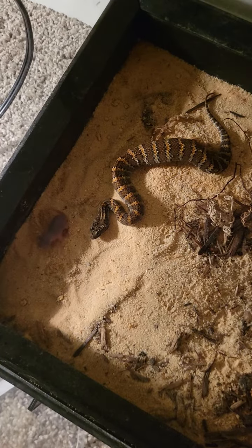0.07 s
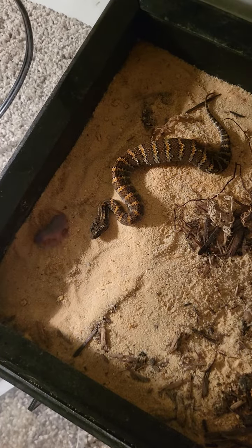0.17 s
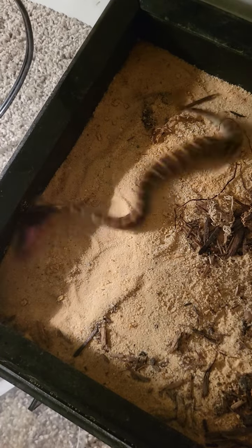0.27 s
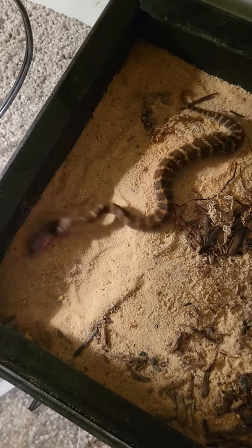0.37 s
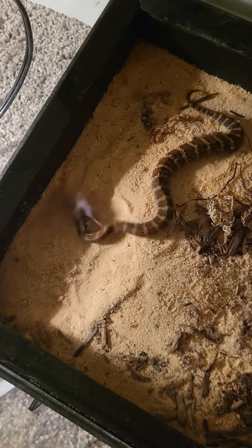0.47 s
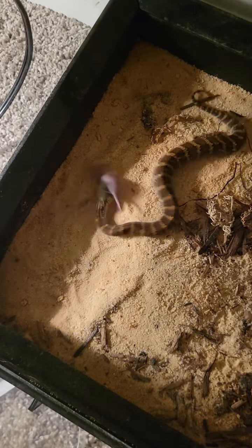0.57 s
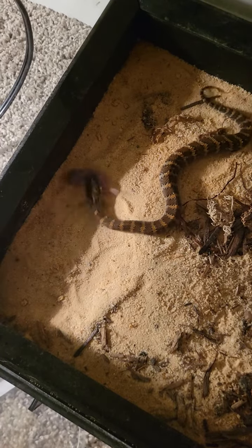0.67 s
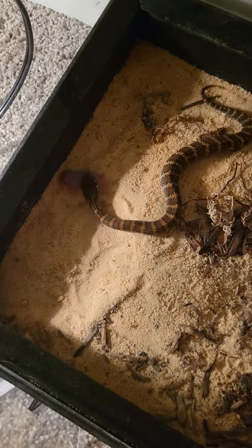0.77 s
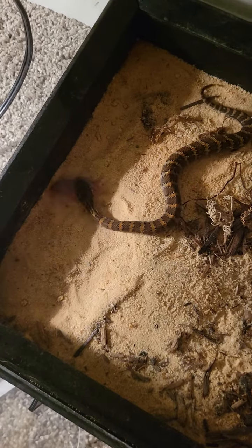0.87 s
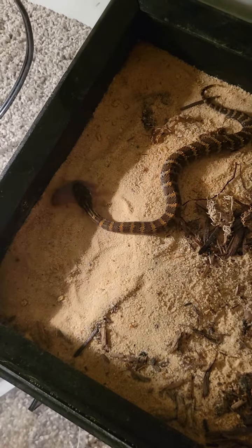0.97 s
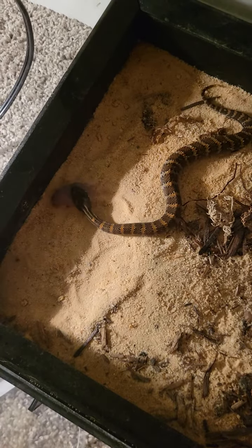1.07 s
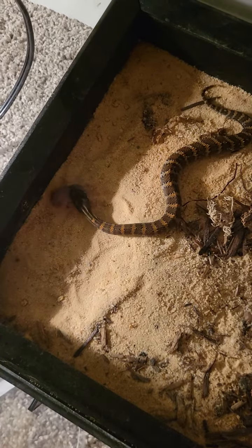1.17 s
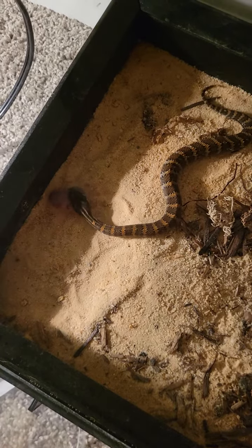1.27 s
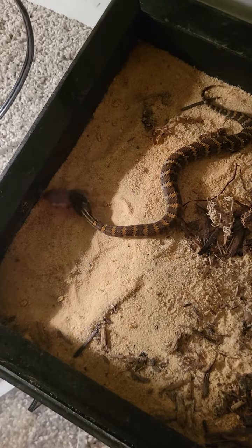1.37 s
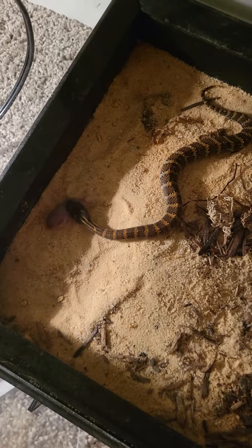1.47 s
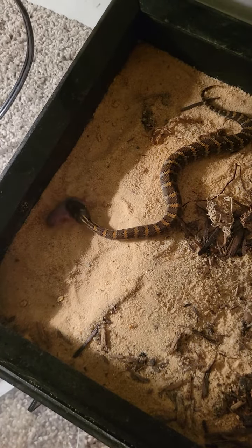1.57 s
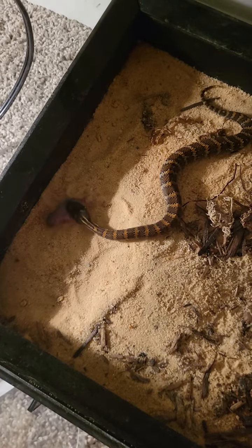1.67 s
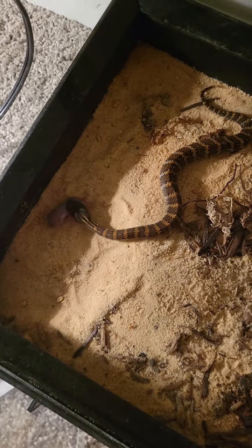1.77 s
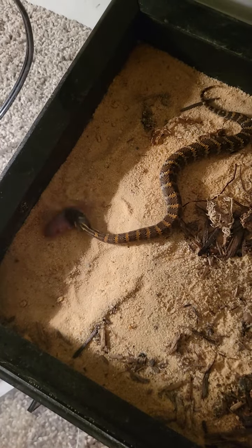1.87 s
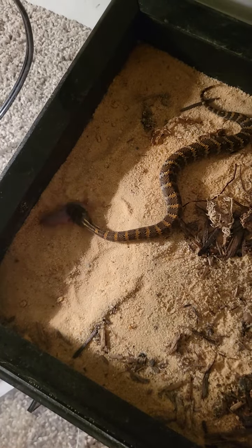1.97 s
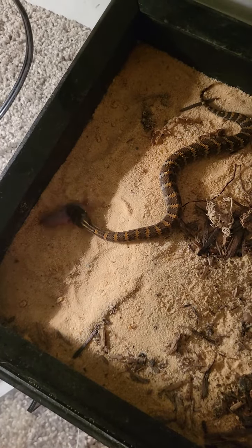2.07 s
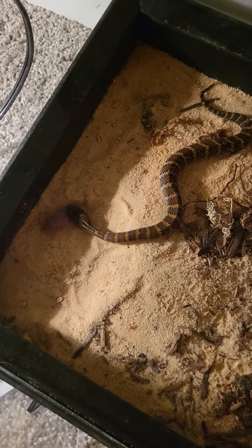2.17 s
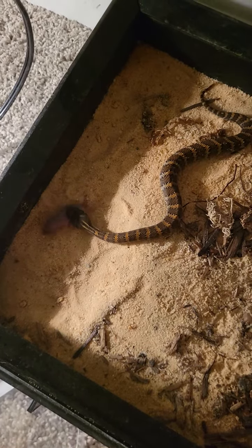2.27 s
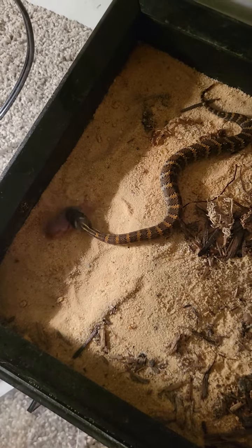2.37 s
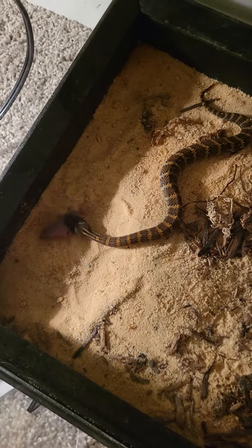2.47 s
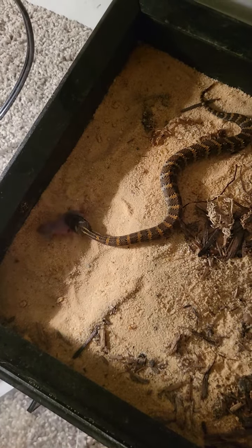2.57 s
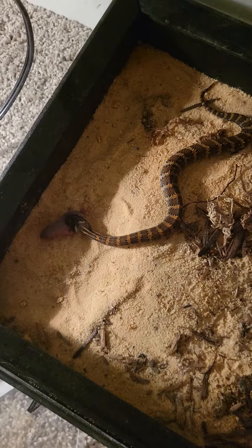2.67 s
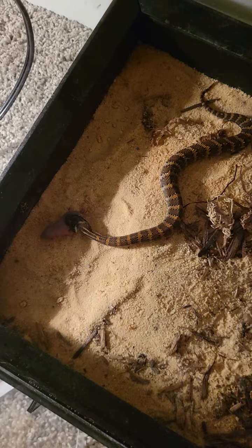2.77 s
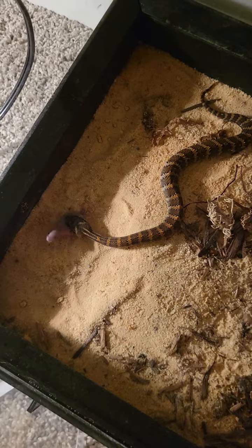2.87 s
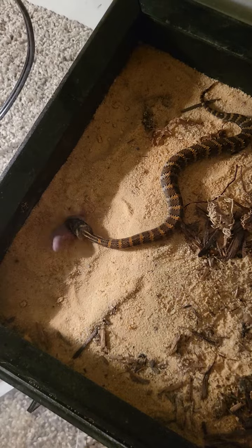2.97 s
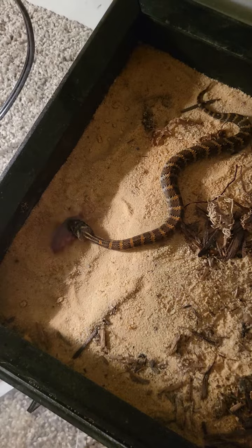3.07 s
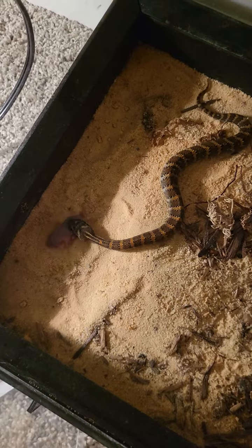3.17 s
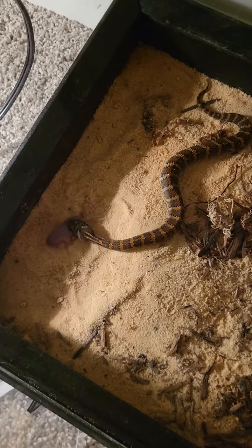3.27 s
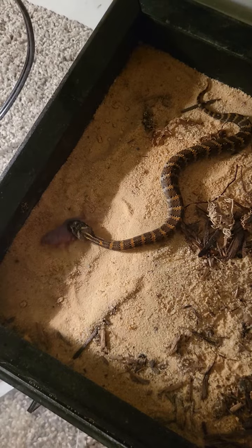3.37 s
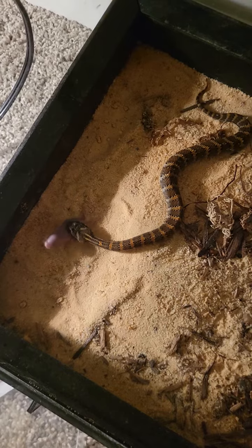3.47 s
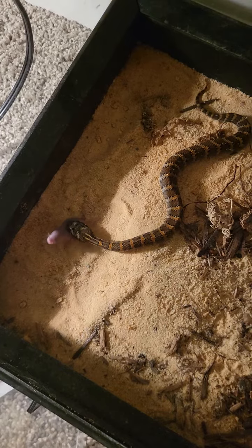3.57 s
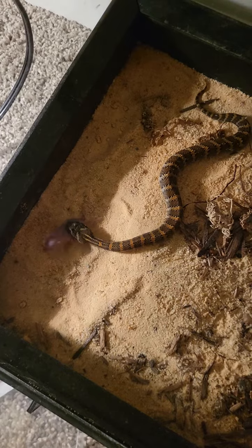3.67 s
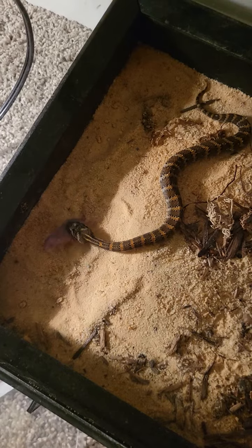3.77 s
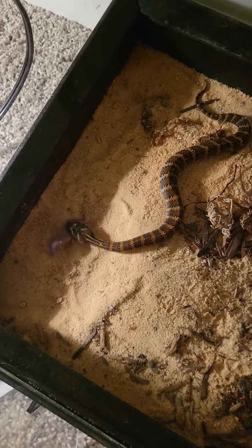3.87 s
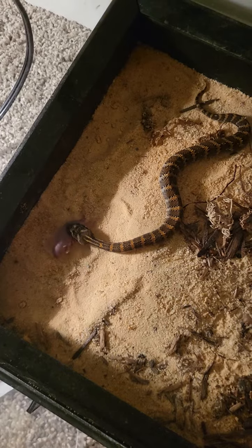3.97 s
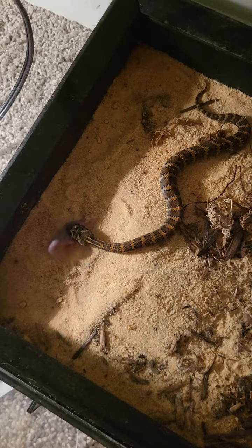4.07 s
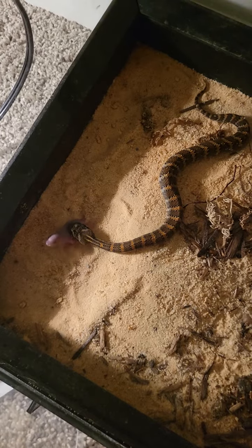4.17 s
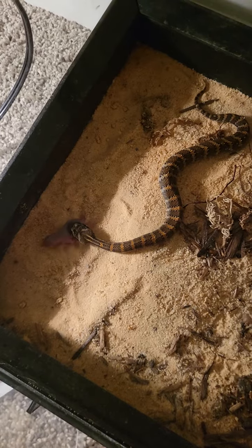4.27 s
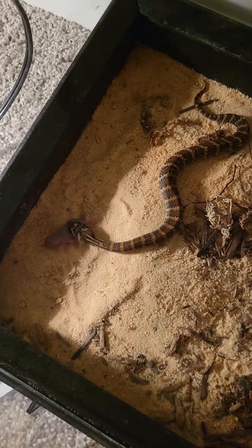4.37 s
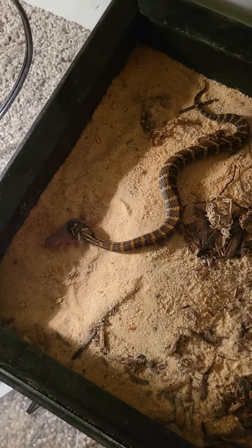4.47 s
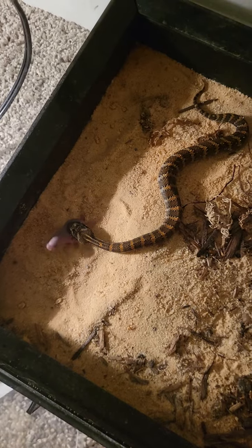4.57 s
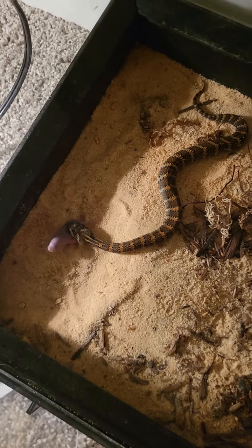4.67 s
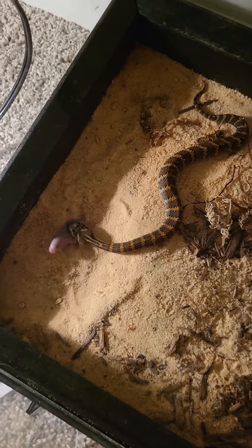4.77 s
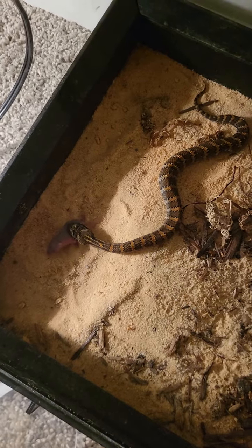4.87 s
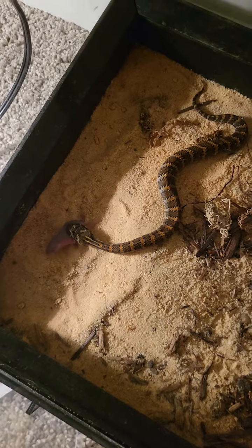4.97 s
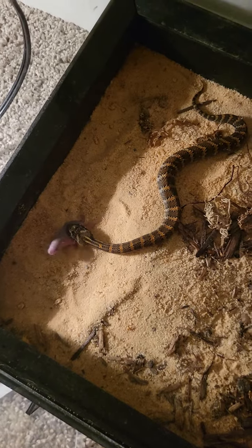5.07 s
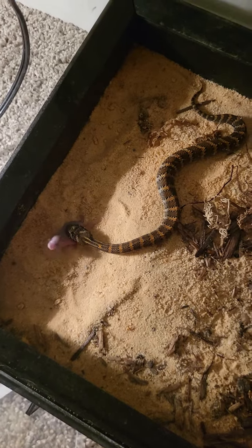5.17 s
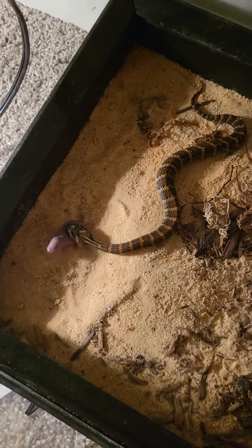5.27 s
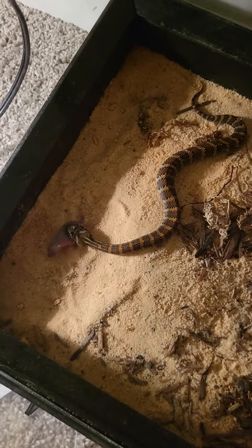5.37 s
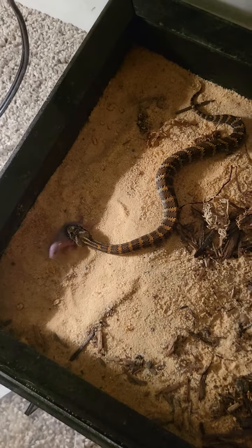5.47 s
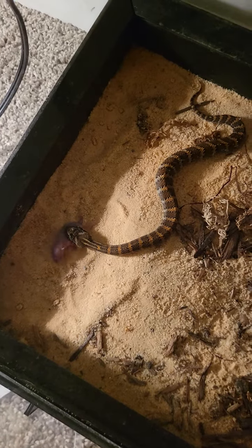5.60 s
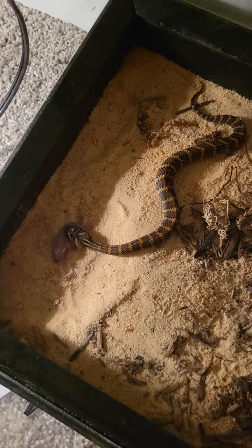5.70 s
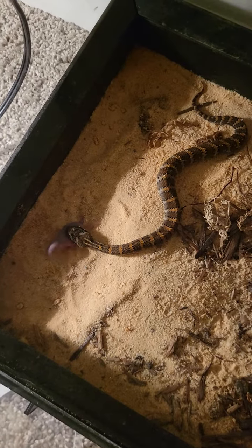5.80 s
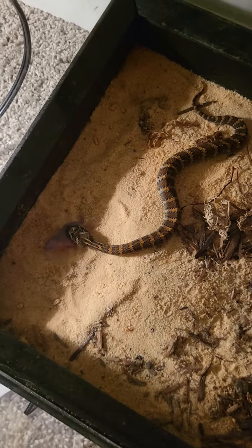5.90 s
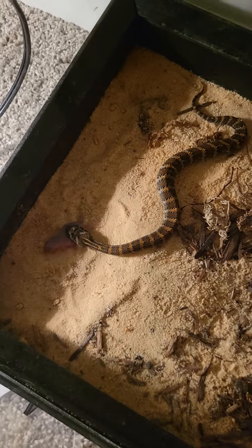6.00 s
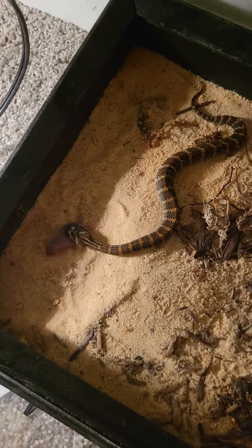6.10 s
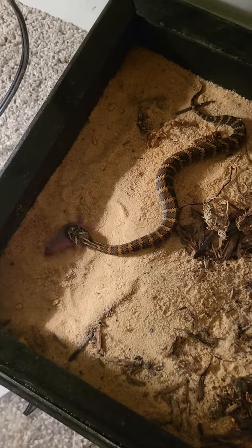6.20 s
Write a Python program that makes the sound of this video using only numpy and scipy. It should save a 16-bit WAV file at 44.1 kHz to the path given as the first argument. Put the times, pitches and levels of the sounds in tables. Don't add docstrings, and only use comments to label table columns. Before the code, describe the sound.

Tiny high rodent squeaks repeat, slow and stop in a quiet room; brief sand rustles precede them and a plastic double knock follows.

```python
import sys
import numpy as np
from scipy import signal
from scipy.fft import rfft, irfft, next_fast_len
from scipy.io import wavfile
from scipy.ndimage import uniform_filter1d

SR = 44100
rng = np.random.default_rng(int(sys.argv[2]) if len(sys.argv) > 2 else 0)


def volts_from_db(level):
    exponent = np.asarray(level, float) / 20
    return 10 ** exponent


def dump(signal):
    limited = np.clip(np.atleast_2d(signal).T, -1, 1)
    pcm = np.round(limited * 32767).astype(np.int16)
    wavfile.write(sys.argv[1], SR, pcm)


N = 275095


def rms_one(x):
    return x / np.sqrt(np.mean(x ** 2) + 1e-20)


def at_hz(points, hz):
    known_hz, values = np.array(points).T
    return np.interp(np.log(np.maximum(hz, 1)), np.log(known_hz), values)


def wobble(rate_hz, size):
    r = np.exp(-2 * np.pi * rate_hz / SR)
    return rms_one(signal.lfilter([1], [1, -2 * r, r * r], rng.standard_normal(size)))


def coloured(x, points):
    size = next_fast_len(x.shape[-1])
    gain = volts_from_db(at_hz(points, np.fft.rfftfreq(size, 1 / SR)))
    return irfft(rfft(x, size) * gain, size)[..., :x.shape[-1]]


def ring(at_s, peak_db, hz, t60, rise_s):
    out, start = np.zeros(N), round(at_s * SR)
    t = np.arange(min(N - start, round(1.5 * max(t60, .001) * SR))) / SR
    envelope = volts_from_db(peak_db - 60 * t / t60) * (1 - np.exp(-t / rise_s))
    out[start:start + len(t)] = envelope * np.sin(2 * np.pi * hz * t)
    return out


def puff(at_s, peak_db, spectrum, t60):
    out, start = np.zeros(N), round(at_s * SR)
    t = np.arange(2200) / SR
    noise = rms_one(coloured(rng.standard_normal(len(t)), spectrum))
    out[start:start + len(t)] = volts_from_db(peak_db - 60 * t / t60) * noise
    return out


def pitch_arch(t, length, rise_s, top_hz, sagged_hz, lateness, collapse_s):
    open_hz, close_hz = 2412, 2037
    pitch = top_hz - (top_hz - sagged_hz) * np.minimum(t / length, 1) ** lateness
    pitch -= (pitch - close_hz) * np.clip(1 - (length - t) / collapse_s, 0, 1) ** 2
    opening = np.clip(1 - t / rise_s, 0, 1) ** 2.5
    return pitch - (pitch - open_hz) * opening


# pitch_hz, level_db
MOUTH = [(1800, -6), (2800, -9.5), (3500, -4.5), (4800, 4.5), (6200, -4), (7500, 2.5), (9500, -9),
         (11500, 3.5), (13000, 6), (14200, 0), (15300, -13), (16500, -16)]


def overtones(pitch, tilt_db, tired_db, glide):
    size = len(pitch)
    jitter = .0025 * volts_from_db(tired_db) * (1 + 3 * glide) * wobble(450, size)
    phase = 2 * np.pi * np.cumsum(pitch * (1 + .004 * wobble(60, size) + jitter)) / SR
    tone, power = np.zeros(size), np.zeros(size)
    for k in range(1, 8):
        shimmer_db = 1.0 * volts_from_db(1.8 * tired_db) * wobble(220, size)
        level_db = at_hz(MOUTH, k * pitch) + np.clip(tilt_db, -9, 11) * np.log2(k) + shimmer_db
        gain = volts_from_db(level_db) * (k * pitch < .45 * SR)
        tone += gain * np.sin(k * phase + k * k)
        power += gain * gain / 2
    return tone / uniform_filter1d(np.sqrt(power), size=400)


# at_s, pitch_hz, width_s, level_db
JERKS = [
    (.584, 383.5, 0.0054, 5),
    (1.134, -120, 0.019, 0),
    (1.195, -80.5, .012, 2),
    (2.073, -200, 0.011, -1),
    (2.095, 157, 0.011, -1),
    (3.333, -110, 0.019, 1),
    (3.353, 61.5, 0.012, 0),
    (4.738, 61, 0.0053, -3),
]
# pitch_hz, level_db
LEAK = [(1200, -24), (2000, -18), (3600, -9), (5300, -9.5), (7500, -3), (9700, -8.5), (12000, 3.5),
        (14200, 3), (16500, -6)]
# pitch_hz, level_db
GASP = [(1500, 1.5), (2500, 5), (6000, 3.5), (16000, 5.5)]


def squeak(start, length, level_db, rise_s, tilt_db, top_hz, sagged_hz, lateness, collapse_s):
    t = np.arange(round((length + 0.071) * SR)) / SR
    spent = t / length
    pitch = pitch_arch(t, length, rise_s, top_hz, sagged_hz, lateness, collapse_s)
    for at_s, hz, width_s, db in JERKS:
        jerk = np.exp(-((start + t - at_s) / width_s) ** 2)
        pitch = pitch + hz * jerk
        level_db = level_db + db * jerk

    effort = np.log2(pitch / 4236)
    level_db = level_db + 10 * effort - 6.5 * np.clip(1 - t / 0.011, 0, 1)
    glide = np.clip(abs(np.gradient(np.log(pitch))) * SR / 40, 0, 1)
    late_s = max(start - 3.5, 0)
    tired_db = 5 * late_s
    tilt_db = tilt_db + 15 * effort + 1.2 * tired_db - 3.5 * glide * np.minimum(spent, 1)
    tone = overtones(pitch, tilt_db, tired_db, glide)

    air_noise = rms_one(coloured(rng.standard_normal(len(t)), LEAK))
    voiced = np.clip((length - t) / 0.0013, 0, 1)
    gasp = volts_from_db(-6) * np.maximum(glide ** 1.2, 1 - voiced) * rms_one(coloured(air_noise, GASP))
    breath_db = -28 + (15 + tired_db) * np.minimum(spent, 1) + 2.6 * wobble(60, len(t))
    pop = volts_from_db(7) * np.exp(-t / .003)
    gasp_s = .001 + .009 * late_s
    fade = np.clip(t / 0.0017, 0, 1) * volts_from_db(-1500 * np.maximum(t - length - gasp_s, 0))
    mix = voiced * volts_from_db(-5 * glide) * tone + (volts_from_db(breath_db) + pop) * air_noise + gasp
    return volts_from_db(level_db) * fade * mix


# start_s, length_s, level_db, rise_s (time to reach pitch), tilt_db (per octave of overtone)
SQUEAKS = [(0.5607, 0.11, -34.5, 0.016, 2.5), (0.808, 0.12, -33.5, 0.033, -3),
           (1.0753, 0.14, -34.5, 0.026, 0), (1.3804, 0.11, -35.5, 0.039, -1.5),
           (1.6717, 0.12, -33, 0.019, 1.5), (1.9858, 0.12, -33, 0.029, 1.5),
           (2.319, 0.13, -33.5, 0.015, 3.5), (2.6736, 0.11, -35, 0.037, 1),
           (3.2833, .1238, -33.5, .031, 2.5), (3.975, .080, -36, 0.027, 0), (4.3333, .088, -35, .025, -2),
           (4.7184, .0445, -36, 0.026, -1.5)]
# top_hz, sagged_hz, lateness (power of the sag), collapse_s
ARCHES = [(5114, 2300, 3, 0.035), (5066, 3150.0, 1.73, 0.013), (4960, 3300.0, 0.74, 0.021),
          (4910, 2610.0, 1.7, 0.036), (5180, 3550.0, 0.98, 0.038), (5570, 3120.0, 0.63, 0.028),
          (4525, 3600, 2.6, 0.019), (5810, 3400.0, 0.52, 0.029), (4180, 2300, 5.4, 0.025),
          (4004, 2970.0, 1.26, 0.01224), (4410, 2940.0, 1.11, 0.031), (3870, 2100, 3, 0.017)]


def pup():
    out = np.zeros(N)
    for row, arch in zip(SQUEAKS, ARCHES):
        call, start = squeak(*row, *arch), round(row[0] * SR)
        out[start:start + len(call)] += call
    return out


# pitch_hz, level_db (per Hz)
SAND = [(150, -51), (250, -22), (292, 2), (710, -3.5), (2050, -8.5), (3280, -18.5), (7570, -17.5),
        (9010, -33), (16000, -21.5)]
# at_s, peak_db, dying_db (per s)
SHOVES = [
    (0.299, -52, 600),
    (.347, -58.5, 300),
    (.37, -69.5, 62),
    (.52, -69.5, 58),
    (.6, -78.5, 123),
]
# start_s, peak_db, centre_hz, length_s
SPRAYS = [
    (0.292, -54.5, 4780, 0.0085),
    (0.443, -46, 4800, 0.017),
    (3.088, -77, 11200, 0.053),
    (4.18, -72, 7950, 0.11),
    (5.041, -62, 2900, 0.0087),
    (5.067, -71.5, 9070, 0.11),
]


def sand():
    t = np.arange(N) / SR
    clumps = volts_from_db(3 * wobble(50, N))
    struck = rng.random(N) < 5000 * clumps / SR
    sizes = volts_from_db(3 * np.minimum(rng.exponential(1, N), 4))
    grains = sizes * rng.choice([-1, 1], N) * struck
    effort = np.zeros(N)
    for at_s, peak_db, dying in SHOVES:
        slope = np.where(t < at_s, 1099.5, dying)
        effort += volts_from_db(peak_db + 4.5 - slope * abs(t - at_s))
    out = rms_one(coloured(grains, SAND)) * effort
    for at_s, peak_db, hz, length in SPRAYS:
        after = (t - at_s - 0.4 * length) / length
        shape = np.exp(-(after / np.where(after < 0, .25, .75)) ** 2)
        sos = signal.butter(2, [hz / 2.6, hz * 1.6], "band", fs=SR, output="sos")
        out += volts_from_db(peak_db) * shape * rms_one(signal.sosfilt(sos, grains))
    return out


# at_s, peak_db, pitch_hz
TICKS = [(0.515, -43, 1240), (2.991, -61, 14000), (3.083, -43.5, 14000), (3.084, -62, 7660),
         (3.105, -63, 7000), (4.089, -62, 12500), (4.27, -65, 13700), (4.468, -51.5, 2990),
         (4.645, -62, 13770), (4.789, -53, 13800), (4.844, -56.5, 401), (4.996, -66.5, 14100),
         (5.127, -64, 13400), (5.132, -52, 13800), (6.13, -64, 2380)]


def ticks():
    out = np.zeros(N)
    for at_s, peak_db, hz in TICKS:
        band = [(hz / 3, -30), (hz / 1.18, -12), (hz, 0), (hz, -12), (hz * 1.7, -35)]
        out += puff(at_s, peak_db, band, 0.0057 + 12 / hz)
    return out


# at_s, peak_db, dull_db (per octave), crack_hz
KNOCKS = [
    (5.0565, -37.5, 4, 2046),
    (5.1038, -35.5, 4.5, 2750),
]
# share of crack_hz, level_db
CRACK = [(.25, -8), (.6, -10), (1, 15.5), (1.4, 3), (2.2, -6.5), (3.6, -21), (5, -37), (8, -33)]
# pitch_hz, level_db, t60_s
TRAY = [(220.8, -4.5, 0.066), (354, -12.5, 0.092), (695, -9.5, 0.03), (1713, -1.5, 0.024),
        (2240, 3.5, 0.006), (2740, -13, 0.026)]


def knocks():
    out = np.zeros(N)
    for at_s, peak_db, dull_db, crack_hz in KNOCKS:
        out += puff(at_s, peak_db + 3, [(share * crack_hz, db) for share, db in CRACK], 0.026)
        for hz, level_db, t60 in TRAY:
            late = 1.87 / hz
            mode_db = peak_db + level_db - dull_db * np.log2(hz / 2000)
            out += ring(at_s + late, mode_db, hz, t60, 0.62 / hz)
    return out


# at_s, peak_db, pitch_hz, t60_s
THUDS = [
    (2.336, -34.5, 125, 0.39),
]


def thud():
    return sum(ring(*row, 0.003) for row in THUDS)


# delay_s, level_db
TRAY_ECHOES = [
    [(.00031, -15.5), (.0011, -34), (.0023, -46.5), (.0041, -5), (.0185, -15.5)],
    [(.00043, -3), (.00087, -40.5), (.0019, 13), (.0036, -31.5), (.0178, -3.5)],
]
# pitch_hz, level_db
PUP_SIDE = [(60, -5.5), (120, -7), (240, 3.5), (480, 0.5), (950, 12), (1890, 7.5), (3770, 0.5),
            (7520, 10.5), (15000, 0.5)]
# pitch_hz, level_db
KNOCK_SIDE = [(125, 1), (250, 3), (500, 1), (1000, 6), (2500, -6.5), (6000, 3), (15000, -3)]


def tray(x, side):
    hz = np.fft.rfftfreq(N, 1 / SR)
    paths = []
    for echoes in TRAY_ECHOES:
        path = np.ones(len(hz), complex)
        for k, (lag, db) in enumerate(echoes):
            path += (-1) ** k * volts_from_db(db) * np.exp(-2j * np.pi * hz * lag)
        paths.append(path / np.sqrt(np.mean(abs(path) ** 2)))
    lean = volts_from_db(at_hz(side, hz) / 2)
    left = paths[0] * lean
    right = paths[1] / lean * np.exp(-2j * np.pi * hz * .00014)
    return irfft(rfft(x) * np.array([left, right]), N)


# pitch_hz, t60_s
ROOM_T60 = [(300, 0.27), (2000, 0.41), (5000, 0.32), (10000, 0.32), (16000, 0.043)]


def room(x):
    t = np.arange(SR // 2) / SR
    edges = 150 * 2 ** np.arange(0, 7.1, .7)
    tail = np.zeros((2, len(t)))
    for low, high in zip(edges, edges[1:]):
        sos = signal.butter(2, [low, high], "band", fs=SR, output="sos")
        band = signal.sosfilt(sos, rng.standard_normal((2, len(t))))
        tail += band * volts_from_db(-60 * t / at_hz(ROOM_T60, np.sqrt(low * high)))
    tail *= np.clip((t - .004) / 0.013, 0, 1)
    tail /= np.sqrt(np.sum(tail ** 2, axis=1, keepdims=True))
    wet = signal.fftconvolve(x[None], tail, axes=1)[:, :N]
    return volts_from_db(-19) * wet * volts_from_db(np.array([[.8], [-.8]]))


# pitch_hz, rms_db
HUM = [(37.3, -59), (42.3, -75), (52, -83), (59.27, -40), (74.3, -66), (118.5, -65.5), (156, -75),
       (177.8, -75)]


def hum():
    t = np.arange(N) / SR
    lines = np.zeros(N)
    for k, (hz, db) in enumerate(HUM):
        level = np.sqrt(2) * volts_from_db(db + 0.72 * wobble(8, N))
        lines += level * np.sin(2 * np.pi * hz * t + 1.08 * k)
    return lines * volts_from_db(np.array([[.5], [-.5]]) * 2.7)


# pitch_hz, likeness (-1 to 1)
LIKENESS = [(60, 0.91), (180, 0.72), (550, 0.34), (1650, 0.012), (4970, -0.022), (15000, -0.02)]
# pitch_hz, level_db (per Hz)
AIR = [(20, -32), (33, -4), (40, 2.5), (100, 1.5), (130, 0.5), (160, -6.5), (250, -15), (500, -25),
       (1000, -33.5), (1800, -34), (3500, -42.5), (7000, -42), (9500, -48), (13000, -43)]


def air():
    alike = np.clip(at_hz(LIKENESS, np.fft.rfftfreq(N, 1 / SR)), 0, 1)
    mid, side = rfft(rng.standard_normal((2, N)))
    pair = irfft(np.sqrt(1 + alike) * mid + np.sqrt(1 - alike) * side * [[1], [-1]], N)
    noise = volts_from_db(-55.5) * rms_one(coloured(pair, AIR))
    stir_from_s, stir_to_s, stir_db, fade_s = 0.29, 4.9, 2.5, 0.34
    t = np.arange(N) / SR
    stir = np.clip(np.minimum(t - stir_from_s, stir_to_s - t) / fade_s + .5, 0, 1)
    gain = volts_from_db(stir_db * stir + .8 * wobble(8, N))
    upper = signal.sosfilt(signal.butter(2, 300, "high", fs=SR, output="sos"), noise)
    return (noise + upper * (gain - 1)) * volts_from_db(np.array([[.8], [-.8]]))


def scene():
    voice = pup() + sand()
    contacts = ticks() + knocks() + thud()
    wet = room(voice + volts_from_db(-1) * contacts)
    return tray(voice, PUP_SIDE) + tray(contacts, KNOCK_SIDE) + wet + hum() + air()


def band_limit(x):
    return signal.sosfilt(signal.butter(12, 16500, fs=SR, output="sos"), x)


def record(dry):
    low_pass = signal.cheby2(12, 50, 16500, fs=SR, output="sos")
    mix = signal.sosfilt(low_pass, dry)
    return band_limit(mix)


dry = scene()
out = record(dry)
dump(out)
```